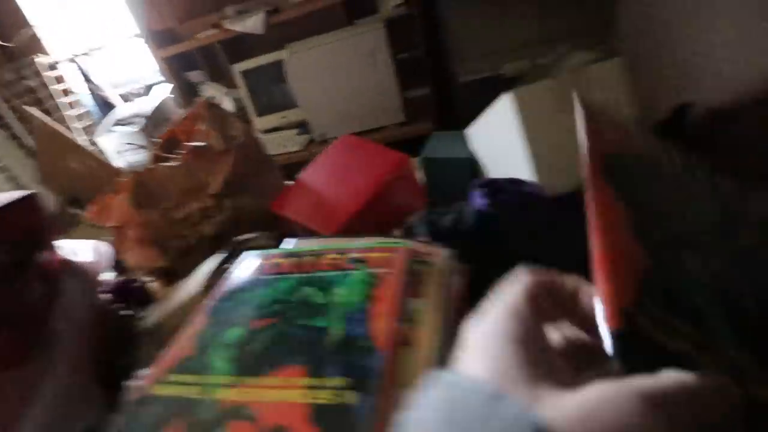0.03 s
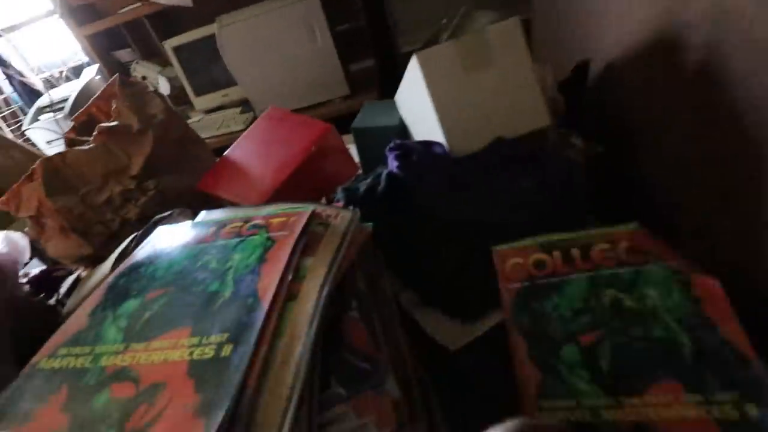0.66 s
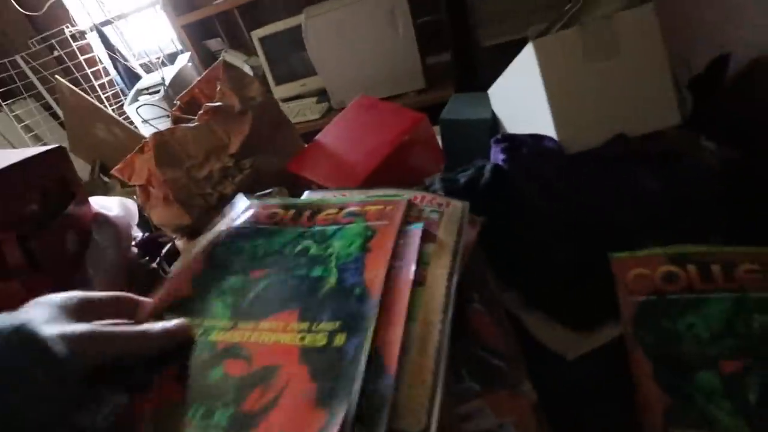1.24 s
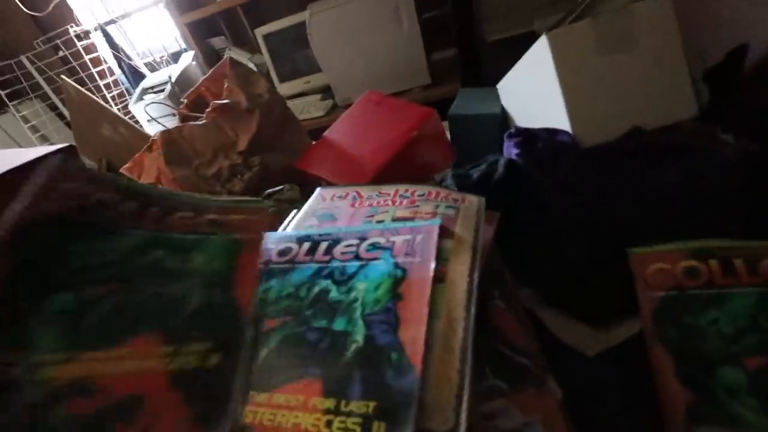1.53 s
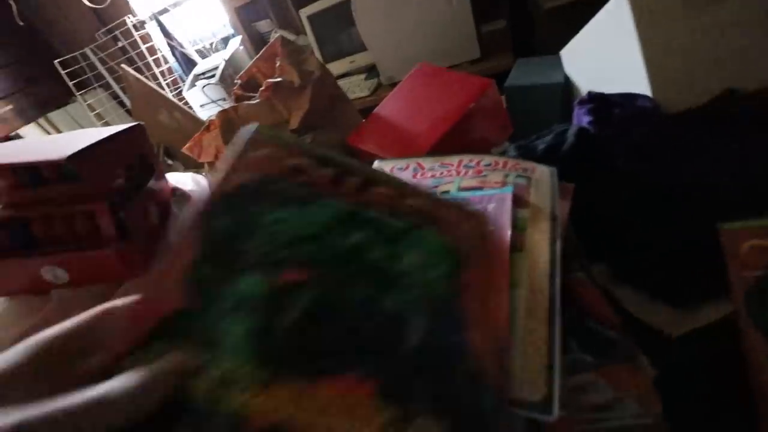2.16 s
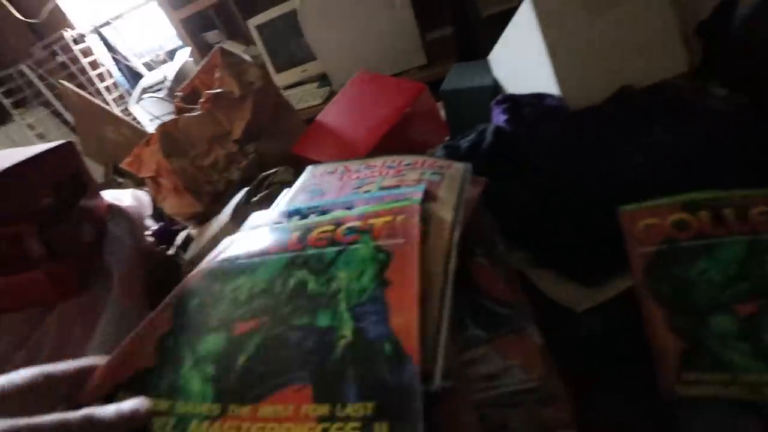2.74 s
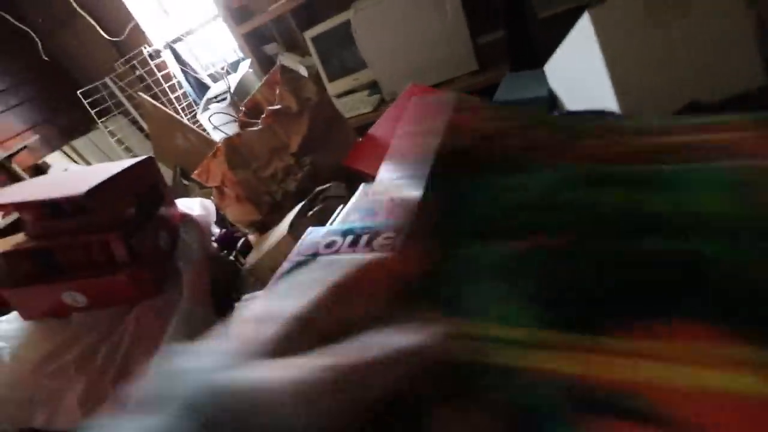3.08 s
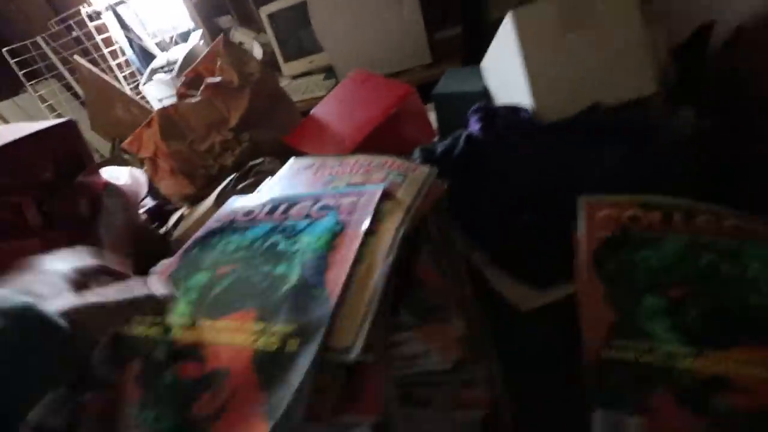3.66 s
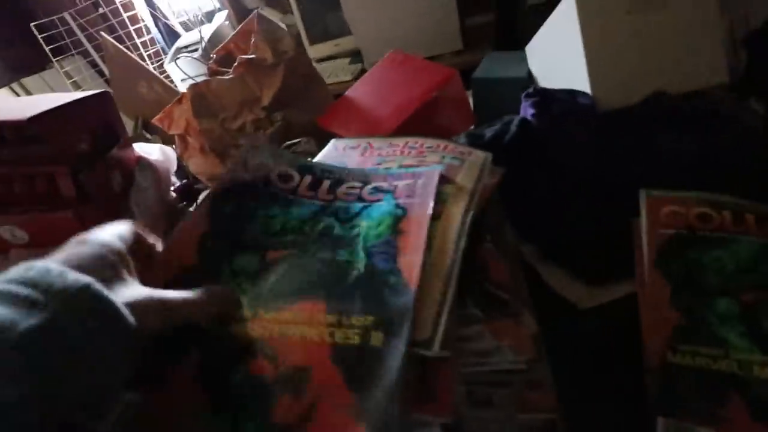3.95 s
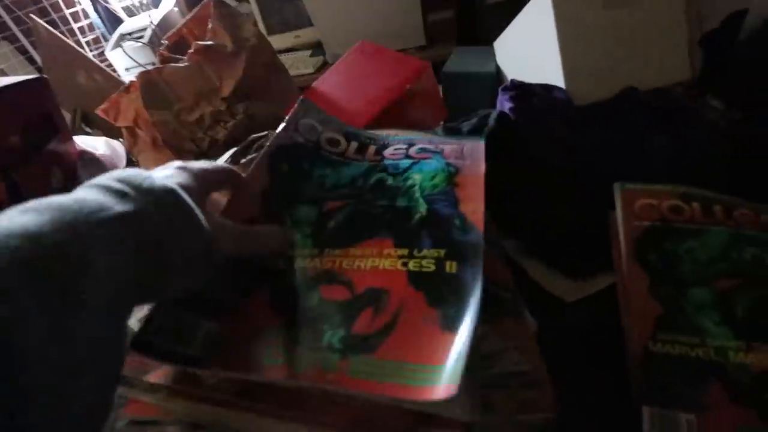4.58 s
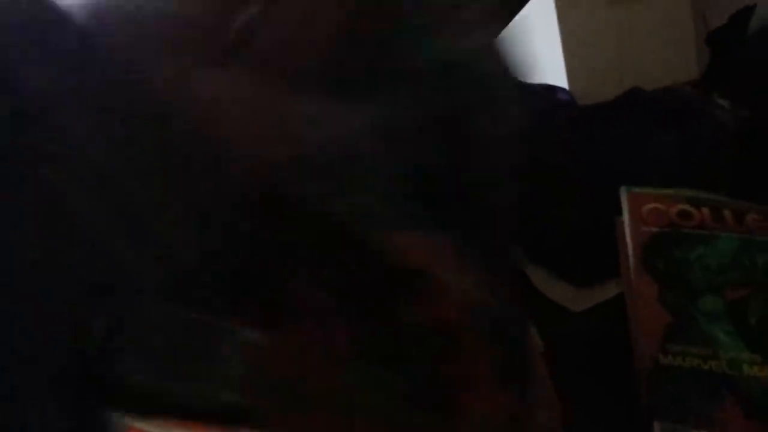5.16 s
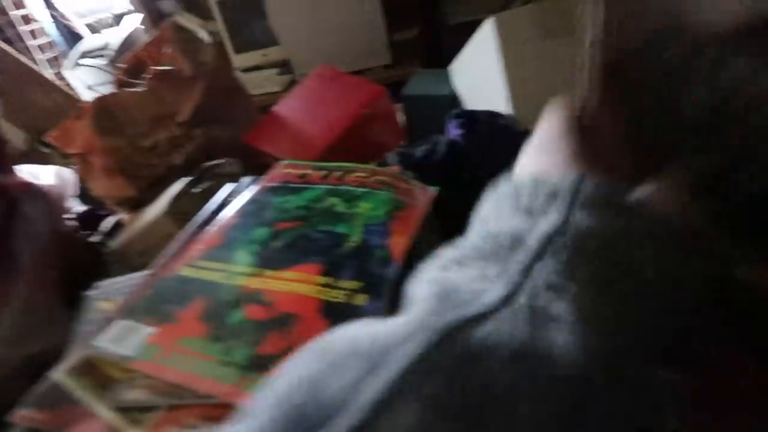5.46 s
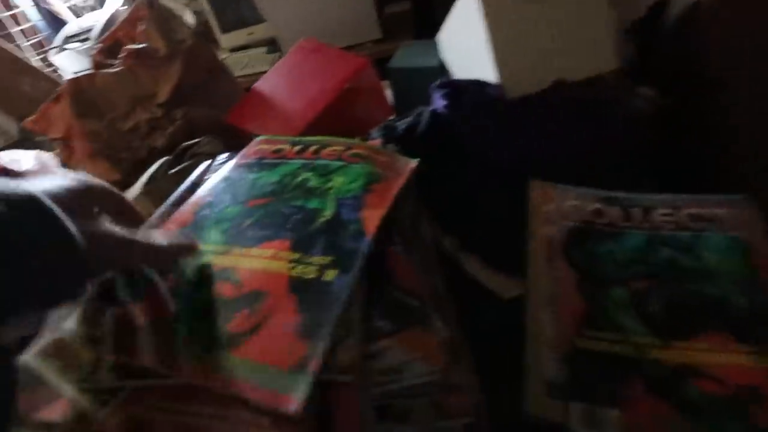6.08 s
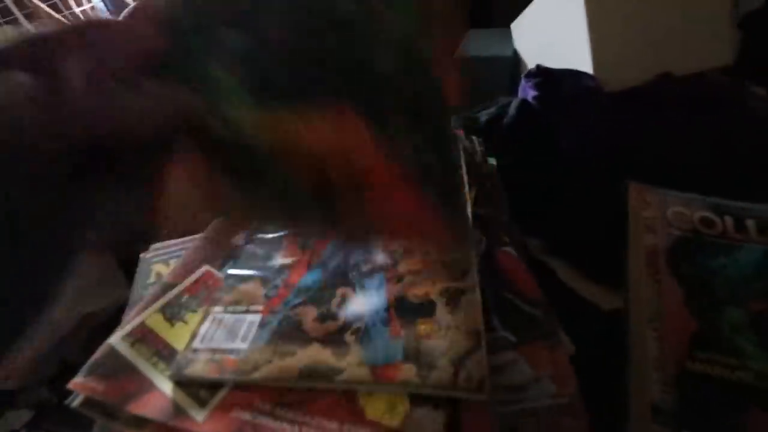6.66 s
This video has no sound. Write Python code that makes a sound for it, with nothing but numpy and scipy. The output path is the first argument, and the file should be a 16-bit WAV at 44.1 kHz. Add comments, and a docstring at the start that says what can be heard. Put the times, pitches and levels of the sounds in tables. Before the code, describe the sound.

Close handling of plastic-bagged magazines: sliding hiss, sharp clicks and short slaps with dull thuds over a faint low rumble.

```python
"""A cluttered, nearly dead room: magazines in plastic sleeves are slid off one pile and dropped on another.
Film hisses, rasps and crinkles over film by stick-slip; stiff sleeves snap as they bend.
Covers land with a short slap and the pile thuds; the hardest blows overload the close microphone.
Behind them: a faint thin ring, a low hum, room hush and the rumble of the hand-held microphone."""
import sys
import numpy as np
from scipy import signal
from scipy.fft import rfft, irfft
from scipy.io import wavfile
from scipy.ndimage import uniform_filter1d

SR = 44100
rng = np.random.default_rng(int(sys.argv[2]) if len(sys.argv) > 2 else 0)


def to_wav(sig):
    """Store sig (one row per channel, or 1-D mono) as 16-bit WAV at the path in sys.argv[1].

    Samples outside -1..1 are clipped; the rate is SR.
    """
    pcm = np.clip(np.atleast_2d(sig), -1, 1) * 32767
    pcm = np.round(pcm).astype(np.int16)
    wavfile.write(sys.argv[1], SR, pcm.T)  # frames by channels


N = 300762
TAPS = 4096
HZ, TAP_HZ = np.fft.rfftfreq(N, 1 / SR), np.fft.rfftfreq(TAPS, 1 / SR)

# Sleeve buckles or edge taps the pile: start_s, energy_db, resonance_hz, edge_hz
SLEEVE_SNAPS = [(0.106, -11, 1570, 4800), (0.166, -21, 700, 2200), (0.3849, 6, 900, 7340),
                (0.4334, 10, 1310, 6300), (1.134, -15.5, 685, 5000), (1.16, -19, 900, 3900),
                (1.6356, -0.1, 1650, 3630), (2.1663, -7, 330, 1060), (2.229, 7.5, 382, 2550),
                (2.452, -14, 1290, 4900), (2.4845, -11.5, 2480, 3660), (2.988, -1.5, 1500, 4750),
                (3.3877, -14.5, 1510, 6600), (3.416, -15.5, 1000, 1100), (3.4742, 2.5, 920, 3950),
                (3.7633, -17.5, 1120, 5100), (3.902, -13, 1320, 1110), (4.073, -11.5, 1050, 1190),
                (4.2475, -9.5, 490, 2200), (4.464, -7.5, 480, 6600), (4.502, 3, 795, 3800),
                (4.5146, 6, 960, 2380), (4.889, 16, 690, 2020), (5.154, -13, 1590, 8700),
                (5.1649, -1.5, 1920, 9500), (5.6395, -13, 1260, 6030), (5.662, 15, 480, 1400),
                (5.7288, 6, 2750, 5900), (5.8162, 5.5, 830, 4500), (6.1541, -9, 1030, 3500),
                (6.3458, 1, 1190, 3020), (6.38, -0.5, 3150, 8400), (6.4, -8, 5000, 12000),
                (6.402, -4.5, 5000, 12000), (6.5557, 5, 970, 6800), (6.5975, 4, 1420, 8000),
                (6.7547, -20.5, 1010, 2500)]
# Cover flops or scuffs: start_s, length_s, energy_db, resonance_hz, edge_hz
COVER_SLAPS = [(0.3056, 0.0038, 6.5, 840, 2980), (0.334, 0.0068, -3, 1700, 9000),
               (0.353, 0.0045, -4.2, 2430, 4500), (0.382, 0.0037, 4.5, 397, 3500),
               (0.412, 0.021, 6, 530, 5200), (0.436, 0.0039, -4, 595, 6000), (0.572, 0.018, -1, 3170, 4020),
               (0.655, 0.011, -2, 373, 6300), (0.683, 0.0066, -5, 890, 4500),
               (2.151, 0.0048, -11, 540, 1480), (2.188, 0.0032, -10, 3660, 6530),
               (2.211, 0.01, 5, 630, 2180), (2.223, 0.02, -1, 710, 2300), (2.341, 0.017, 1, 650, 6500),
               (2.959, 0.0035, -4, 2050, 1520), (3.5051, 0.0054, 14, 2600, 4340),
               (3.877, 0.0059, -13, 550, 5000), (3.913, 0.011, -8, 1320, 5530),
               (4.086, 0.017, -9.5, 1470, 7000), (4.315, 0.0098, -8, 1560, 6600),
               (4.507, 0.012, 6.5, 860, 1720), (4.519, 0.0028, 4.5, 543, 5070),
               (5.135, 0.0025, -9, 420, 3500), (5.259, 0.006, -6, 690, 5000),
               (5.6645, 0.0053, 15, 990, 4300), (5.806, 0.028, -0.5, 580, 4670),
               (6.42, 0.0052, 0, 1200, 4000), (6.555, 0.0042, 6.5, 930, 5430),
               (6.594, 0.01, 12, 1160, 5740)]
# Weight lands on a pile: start_s, energy_db, decay_s
PILE_THUDS = [(0.164, -12, 0.0076), (0.385, 2.5, 0.1), (0.658, -9.5, 0.037), (2.227, -1, 0.0057),
              (2.349, -6.5, 0.019), (3.475, 3, 0.025), (3.503, -9, 0.1), (4.512, 3, 0.015),
              (4.8882, 9, 0.0011), (5.665, 7, 0.06), (5.813, -3, 0.022)]
# Short low handling bumps, knocks and squeaks: start_s, length_s, energy_db, pitch_hz
LOW_BUMPS_AND_SQUEAKS = [(0.386, 0.011, 5.5, 1240), (2.217, 0.02, -1, 780), (2.226, 0.021, 2.5, 59.7),
                         (3.499, 0.024, 3, 165), (3.502, 0.011, 8, 389), (3.505, 0.012, 7.5, 1230),
                         (4.082, 0.011, -5.5, 93), (4.504, 0.023, 0.5, 62.7), (5.231, 0.064, -6.5, 86),
                         (4.8872, 0.0031, 12, 510), (5.706, 0.047, 2, 444.5), (6.477, .016, 2, 947),
                         (6.505, .009, -3.5, 880)]
# Sleeve slides over sleeve: start_s, length_s, hiss_db, drum_offset_db, sheen_offset_db
SLIDE_STROKES = [(0.0, 0.053, -49, -32, -11), (0.045, 0.16, -56, 1, -8), (0.299, 0.25, -37, 3.5, -11.5),
                 (0.475, 0.15, -41, -26, -9), (0.634, 0.11, -44, 1, -13), (1.22, 0.39, -38.5, -32, -4.5),
                 (1.503, 0.092, -58, -18, 9), (1.606, 0.12, -49, -17, -12), (2.112, 0.044, -52, -4, -10),
                 (2.203, 0.11, -35, -3.5, -5), (2.307, 0.11, -35.5, -13, -7.5),
                 (2.554, 0.14, -44, -10, -11), (2.66, 0.11, -45.5, -4, -6), (2.777, 0.045, -42.5, -8, -16),
                 (2.844, 0.14, -38.5, -5.5, -4.5), (3.327, 0.086, -50.5, 1.5, -8),
                 (3.468, 0.12, -42.5, 9, -11), (3.854, 0.12, -47.5, 3, -13),
                 (4.011, 0.098, -47.5, -2.5, -11), (4.085, 0.14, -36, -5.5, -1.5),
                 (4.225, 0.14, -46.5, 1, -9), (4.49, 0.079, -42.5, 8, -15), (4.567, 0.095, -43, -3.5, -12),
                 (4.778, 0.083, -54.5, 8, -19), (4.855, 0.04, -41.5, -6.5, -3),
                 (4.915, 0.042, -45, -11, -8), (4.98, 0.085, -54.5, -12, 4), (5.024, 0.074, -35, -9, -8.5),
                 (5.08, 0.14, -45.5, -1, -8.5), (5.252, 0.037, -40, -8, -12), (5.275, 0.055, -49.5, -7, 0),
                 (5.32, 0.05, -47.5, 4.5, -2), (5.385, 0.11, -44, 1, -8), (5.663, 0.15, -35.5, 4, -7),
                 (6.164, 0.13, -40, -13.5, -11.5), (6.388, 0.12, -32.5, -14, -5),
                 (6.498, 0.075, -46.5, 2.5, -13), (6.531, 0.17, -37.5, -7, -12)]
# Fingers rub the sleeve: time_s, level_db
FINGER_RUB = [(0.1, -54.5), (0.29, -64), (0.6, -51.5), (0.9, -73), (1.08, -67.5), (1.25, -50),
              (1.75, -61.5), (2.03, -64), (2.2, -56), (2.9, -55), (3.2, -63.5), (3.55, -51), (3.75, -61),
              (4.0, -63), (4.3, -53.5), (4.45, -56.5), (4.75, -58.5), (5.2, -43.5), (5.37, -61.5),
              (5.5, -53), (5.85, -55.5), (6.08, -64), (6.35, -48), (6.8, -61)]
# Rubbed film: freq_hz, relative_db
FILM_SPECTRUM = [(150, 2.5), (300, 3), (600, 6), (900, 6.5), (1700, 2.5), (2500, 0), (3500, 2.5),
                 (4400, -2), (5500, 2), (7400, -3.5), (11000, -0.5), (15500, -10.5)]
# Film catches on film: start_s, length_s, level_db, pitch_hz
FILM_RASPS = [(0.492, 0.083, -36, 2900), (3.524, 0.093, -43, 2800), (4.107, 0.13, -38.5, 1670),
              (4.582, 0.06, -39.5, 3250), (4.846, 0.031, -38, 1320), (5.028, 0.087, -37, 1180)]
# Thin ring, resonances: centre_hz, width_hz, relative_db
RING_PEAKS = [(2190, 560, 0), (3850, 160, -2), (4500, 120, -0.5), (5560, 250, -1), (7160, 230, -5)]
# Thin ring, envelope: time_s, level_db
RING_ENVELOPE = [(1.55, -75), (1.66, -57), (1.95, -56.5), (2.5, -85)]
# Room hum, tones: pitch_hz, base_db
HUM_TONES = [(98, -58.5), (133, -53.5), (237, -61.5)]
# Room hum, stronger at first: time_s, gain_db
HUM_GAIN = [(.12, 5), (.25, -7), (1.9, -2), (2.5, -4), (6.8, -4.5)]
# Room hush and handling rumble: freq_hz, relative_db
HUSH_SPECTRUM = [(4, -56), (9, 1), (13, 0), (20, -4), (30, -22.5), (45, -27), (80, -29), (140, -31.5),
                 (220, -32.5), (400, -41), (1000, -42), (2500, -54.5), (6000, -59), (15000, -58)]
# Room decay: freq_hz, t60_s
ROOM_DECAY = [(200, 0.11), (530, 0.23), (1400, 0.43), (3700, 0.19), (9700, 0.05)]


def sleeve_snaps(contact_s=0.00004, crack_s=0.00083, flutter_s=0.0026, flutter_limit_db=7):
    """A blunt pulse, a bright crack, then flutter as the bend runs through the sleeve."""
    out, t = np.zeros(N), np.arange(TAPS) / SR
    pulse = np.exp(-t / contact_s)
    for start_s, energy_db, resonance_hz, edge_hz in SLEEVE_SNAPS:
        excess_db = max(energy_db - flutter_limit_db, 0)  # thin film can only flutter so much
        burst = contacts(np.exp(-t / crack_s), spread_db=5)
        crack = unit_energy(np.diff(burst, prepend=0))
        flutter = contacts(t * np.exp(-2 * t / flutter_s) / flutter_s, spread_db=6)
        force = pulse / pulse.sum() + gain_of(-4) * crack + gain_of(-8 - excess_db) * flutter
        sheet = sheet_response(energy_db, resonance_hz, edge_hz, air_db=-10)
        snap = bending_wave(signal.fftconvolve(force, sheet))
        add(out, start_s, gain_of(energy_db) * unit_energy(snap))
    return out


def cover_slaps(lead_s=0.02, graze_s=0.0033, settle_s=0.003, heavy_db=11):
    """Contacts build as a cover lands and die as it settles; a heavy one grazes the pile first."""
    out, t = np.zeros(N), np.arange(TAPS) / SR - lead_s
    for start_s, length_s, energy_db, resonance_hz, edge_hz in COVER_SLAPS:
        rise = np.clip(t / (0.33 * length_s), 0, 1)
        settle = np.exp(-np.maximum(t - 0.76 * length_s, 0) / settle_s)
        graze_db = -12 - 1.4 * max(heavy_db - energy_db, 0)
        graze = gain_of(graze_db) * np.exp(-abs(t) / graze_s)
        force = contacts(rise * settle + graze, spread_db=3.5)
        sheet = sheet_response(energy_db, resonance_hz, edge_hz, air_db=-16)
        slap = signal.fftconvolve(force, sheet)
        add(out, start_s - lead_s, gain_of(energy_db) * unit_energy(slap))
    return out


def contacts(envelope, spread_db, passes=6):
    """A flurry of tiny uneven impacts, whitened: many contact points favour no pitch."""
    force = rng.standard_normal(TAPS) * uneven_gains(TAPS, spread_db)
    for _ in range(passes):
        power = uniform_filter1d(abs(rfft(force * envelope)) ** 2, size=25)
        force = irfft(rfft(force) / (power + 1e-9) ** 0.25)
    return unit_energy(force * envelope)


def sheet_response(energy_db, resonance_hz, edge_hz, air_db, damping=0.73, droop=0.83):
    """One contact: damped paper resonance, tick of the film, push of trapped air."""
    hz, ratio = TAP_HZ, TAP_HZ / resonance_hz
    resonance = ratio ** 2 / np.hypot(1 - ratio ** 2, damping * ratio)
    paper = resonance * lowpass(hz, resonance_hz) ** droop * lowpass(hz, edge_hz, 5)
    tick_db = -25 + 4.5 * np.log2(edge_hz / 4000) + 0.38 * energy_db  # crisp or hard: brighter
    tick = gain_of(tick_db) * highpass(hz, resonance_hz) * lowpass(hz, 8000) * lowpass(hz, 12500, 4)
    air = gain_of(air_db) * highpass(hz, 130) * lowpass(hz, 450, 2)
    return minimum_phase(np.sqrt(paper ** 2 + tick ** 2 + air ** 2))


def bending_wave(x, lag_s=0.00025, lag_at_hz=1500, echo_gain=0.44, echo_s=0.000663):
    """Lows travel slower in a sheet, so a pulse chirps; the nearest edge returns an echo."""
    chirp = np.exp(-4j * np.pi * lag_s * np.sqrt(lag_at_hz * TAP_HZ))
    delay_s = echo_s * rng.uniform(0.47, 2.05)
    comb = 1 + echo_gain * np.exp(-2j * np.pi * TAP_HZ * delay_s)
    return irfft(rfft(x, TAPS) * chirp * comb)


def pile_thuds(rise_s=0.004, low_hz=130, high_hz=550):
    """Stacked paper knocks dully under each landing."""
    out, t = np.zeros(N), np.arange(SR // 2) / SR
    pile = coloured(rng.standard_normal(N), highpass(HZ, low_hz, 2) * lowpass(HZ, high_hz, 3))
    for start_s, energy_db, decay_s in PILE_THUDS:
        envelope = np.minimum(t / rise_s, 1) * np.exp(-t / decay_s)
        knock = np.roll(pile, -round(start_s * SR))[:len(t)]
        add(out, start_s, gain_of(energy_db) * unit_energy(envelope * knock))
    return out


def low_bumps_and_squeaks(sag=0.14, roughness=0.56):
    """Handling bumps, knocks and squeaks: a few uneven cycles swell and die, sagging in pitch."""
    out = np.zeros(N)
    for start_s, length_s, energy_db, pitch_hz in LOW_BUMPS_AND_SQUEAKS:
        progress = np.linspace(0, 1, round(length_s * SR))
        cycles = np.cumsum(pitch_hz * (1 + sag * (0.5 - progress))) / SR
        jitter = roughness * np.interp(cycles, np.arange(TAPS), rng.standard_normal(TAPS))
        wave = (1 + jitter) * np.sin(2 * np.pi * cycles + jitter)
        swell = np.sin(np.pi * progress) ** 2
        add(out, start_s, gain_of(energy_db) * unit_energy(swell * wave))
    return out


def sleeve_slides(drum_level, hiss_level, sheen_level, drum_hz=1700, sheen_hz=6000):
    """The same slips drum on the paper, hiss in the film and add a high sheen."""
    rub = stick_slip()
    film = gain_of(log_lookup(FILM_SPECTRUM, HZ)) * highpass(HZ, 120)
    drum_band = lowpass(HZ, drum_hz, 3)
    hiss_band = highpass(HZ, drum_hz, 3) * lowpass(HZ, sheen_hz, 5)
    sheen_band = highpass(HZ, sheen_hz, 5)
    drum = drum_level * coloured(rub, film * drum_band)
    hiss = hiss_level * coloured(rub, film * hiss_band)
    sheen = sheen_level * coloured(rub, film * sheen_band)
    return drum + hiss + sheen


def slide_levels(skew=0.76, speed_powers=(1, 0.84, 1.2), finger_sheen_db=-9.5):
    """Drum, hiss and sheen amplitudes: an early-peaking arch of speed per stroke, over finger rub."""
    t = np.arange(N) / SR
    fingers = gain_curve(FINGER_RUB)
    energies = np.array([fingers, fingers, gain_of(finger_sheen_db) * fingers]) ** 2
    for start_s, length_s, hiss_db, drum_offset_db, sheen_offset_db in SLIDE_STROKES:
        speed = np.sin(np.pi * (t[t < length_s] / length_s) ** skew)
        offsets_db = (drum_offset_db, 0, sheen_offset_db)
        for energy, offset_db, power in zip(energies, offsets_db, speed_powers):
            add(energy, start_s, (gain_of(hiss_db + offset_db) * speed ** power) ** 2)
    return np.sqrt(energies)


def stick_slip(slips_per_s=3500, hiss_gain=0.8, patch_db=1.8):
    """Tiny releases over smooth hiss; the colour shifts in patches as the contact moves."""
    slips = (rng.random(N) < slips_per_s / SR) * rng.choice([-1, 1], N)
    slips = unit_rms(slips * uneven_gains(N, spread_db=3))
    spectra = signal.stft(slips + hiss_gain * rng.standard_normal(N), nperseg=256)[2]
    patches = uniform_filter1d(rng.standard_normal(spectra.shape), size=3, axis=0)
    patches = unit_rms(uniform_filter1d(patches, size=6, axis=1))
    return signal.istft(spectra * gain_of(patch_db * patches), nperseg=256)[1][:N]


def film_rasps(relative_width=0.36):
    """Quick irregular slips ring one resonance of the taut film."""
    out = np.zeros(N)
    for start_s, length_s, level_db, pitch_hz in FILM_RASPS:
        n = round(length_s * SR)
        arch = np.sin(np.linspace(0, np.pi, n))
        band = peak(np.fft.rfftfreq(n, 1 / SR), pitch_hz, relative_width * pitch_hz)
        add(out, start_s, gain_of(level_db) * arch * coloured(rng.standard_normal(n), band))
    return out


def crinkles(hiss_level, pops_per_s=90, offset_db=-7, low_hz=1300, high_hz=7000, pitches=8, q=3):
    """Small creases pop at random while the sleeve slides, the high ones stronger."""
    out, t = np.zeros(N), np.arange(TAPS) / SR
    for pitch_hz in np.geomspace(low_hz, high_hz, pitches):
        triggers = rng.random(N) < pops_per_s / pitches / SR
        kicks = triggers * uneven_gains(N, spread_db=1.5, cap=3)
        pop = unit_energy(t * np.exp(-t * pitch_hz * np.pi / q) * np.sin(2 * np.pi * pitch_hz * t))
        tilt_db = 2 * np.log2(pitch_hz / low_hz)
        out += gain_of(tilt_db) * signal.oaconvolve(kicks, pop)[:N]
    return gain_of(offset_db) * hiss_level * unit_rms(out)


def room_echoes(x, gain_db=-27, echoes_per_s=3000, first_s=0.0015, dull_hz=5000):
    """Weak echoes scatter off the clutter, each band dying at its own rate."""
    n = SR // 2
    echoes = rng.standard_normal(n) * (rng.random(n) < echoes_per_s / SR)
    echoes *= np.arange(n) > first_s * SR
    hz, t, spectra = signal.stft(echoes, SR, nperseg=256)
    t60_s = log_lookup(ROOM_DECAY, hz)[:, None]
    fade = gain_of(-60 * t / t60_s) * lowpass(hz, dull_hz)[:, None]
    response = unit_energy(signal.istft(spectra * fade, SR, nperseg=256)[1])
    return gain_of(gain_db) * signal.fftconvolve(x, response)[:N]


def thin_ring():
    """Faint narrow resonances linger and fade."""
    peaks = sum(gain_of(db) * peak(HZ, centre_hz, width_hz) for centre_hz, width_hz, db in RING_PEAKS)
    return gain_curve(RING_ENVELOPE) * coloured(rng.standard_normal(N), peaks)


def room_hum(waver_depth=0.32, waver_hz=4.6):
    """Low tones waver slowly in strength and phase."""
    out, t = np.zeros(N), np.arange(N) / SR
    slow_band = lowpass(HZ, waver_hz, 2) ** 2
    for pitch_hz, base_db in HUM_TONES:
        real, imag = (coloured(rng.standard_normal(N), slow_band) for _ in range(2))
        waver = 1 + waver_depth * (real + 1j * imag)
        tone = (waver * np.exp(2j * np.pi * pitch_hz * t)).real
        out += gain_of(base_db) * unit_rms(tone)
    return gain_curve(HUM_GAIN) * out


def hush_and_rumble(level_db=-35):
    """Steady room hush over the deep rumble of the moving microphone."""
    spectrum = gain_of(log_lookup(HUSH_SPECTRUM, HZ))
    return gain_of(level_db) * coloured(rng.standard_normal(N), spectrum)


def gain_of(db):
    return 10 ** (np.asarray(db) / 20)


def gain_curve(rows):
    """Amplitude per sample from rows of time_s, level_db."""
    time_s, level_db = np.transpose(rows)
    return gain_of(np.interp(np.arange(N) / SR, time_s, level_db))


def uneven_gains(n, spread_db, cap=4):
    """Random strengths: many small, a few large."""
    return gain_of(spread_db * np.minimum(rng.exponential(1, n), cap))


def unit_rms(x):
    return x / np.sqrt(np.mean(x ** 2) + 1e-20)


def unit_energy(x):
    return x / np.sqrt(np.sum(x ** 2) + 1e-20)


def log_lookup(rows, hz):
    """Interpolates a table over log frequency."""
    freq_hz, values = np.transpose(rows)
    return np.interp(np.log(hz + 1), np.log(freq_hz + 1), values)


def lowpass(hz, corner_hz, order=1):
    return 1 / np.hypot(1, (hz / corner_hz) ** order)


def highpass(hz, corner_hz, order=1):
    return (hz / corner_hz) ** order * lowpass(hz, corner_hz, order)


def peak(hz, centre_hz, width_hz):
    return 1 / (1 + (2 * (hz - centre_hz) / width_hz) ** 2)


def coloured(x, magnitude):
    """Filters x and scales it to rms 1."""
    return unit_rms(irfft(rfft(x) * magnitude, len(x)))


def minimum_phase(magnitude):
    """The fastest-dying impulse response with this magnitude."""
    log_gain = np.log(np.maximum(np.r_[magnitude, magnitude[-2:0:-1]], 1e-5))
    return np.fft.ifft(np.exp(np.conj(signal.hilbert(log_gain)))).real


def add(mix, start_s, sound):
    part = mix[max(round(start_s * SR), 0):][:len(sound)]
    part += sound[:len(part)]


def scene():
    """Close, central handling over the background; both channels alike."""
    drum_level, hiss_level, sheen_level = slide_levels()
    near = sleeve_snaps() + cover_slaps() + pile_thuds() + low_bumps_and_squeaks()
    near += sleeve_slides(drum_level, hiss_level, sheen_level) + film_rasps() + crinkles(hiss_level)
    mono = near + room_echoes(near) + thin_ring() + room_hum() + hush_and_rumble()
    return np.array([mono, mono])


def record(dry, hiss_db=-67.5, cutoff_hz=15950):
    """Faint hiss per channel, overload at full scale, then a band limit."""
    clipped = np.clip(dry + gain_of(hiss_db) * rng.standard_normal(dry.shape), -1, 1)
    band_limit = signal.firwin(511, cutoff_hz, window=("kaiser", 9), fs=SR)
    return signal.oaconvolve(clipped, band_limit[None], "same")


dry = scene()
out = record(dry)
to_wav(out)
```